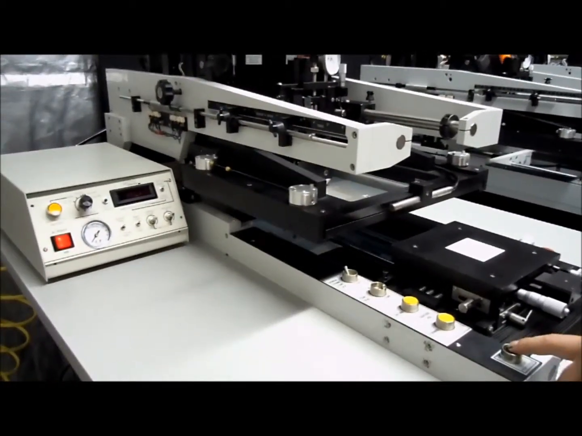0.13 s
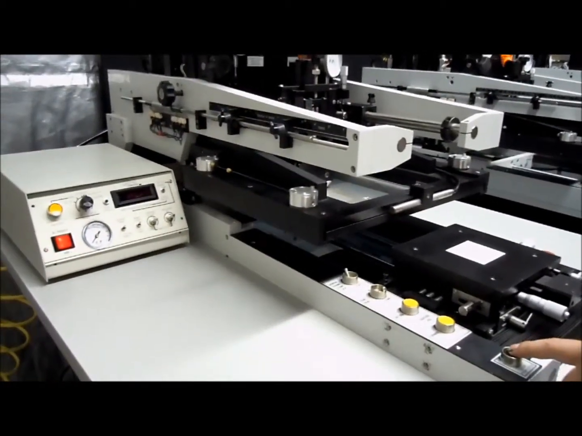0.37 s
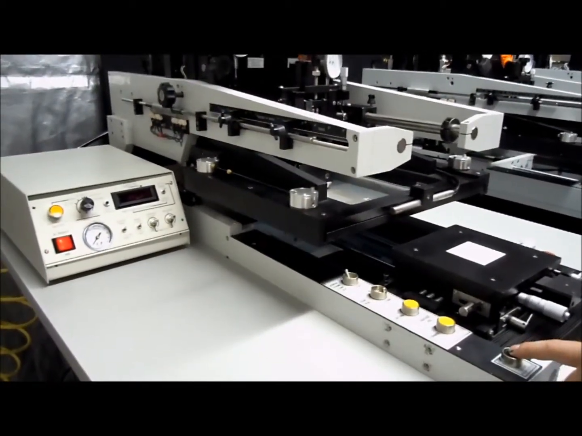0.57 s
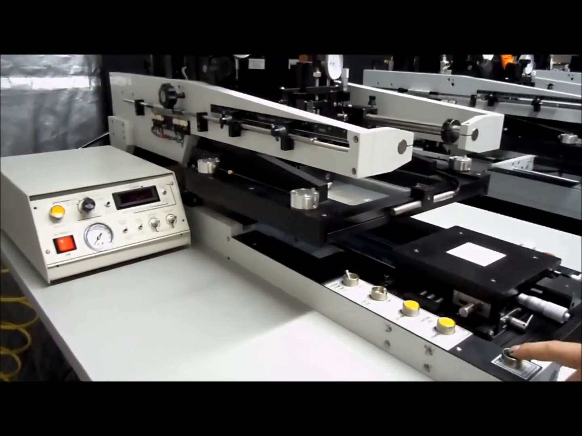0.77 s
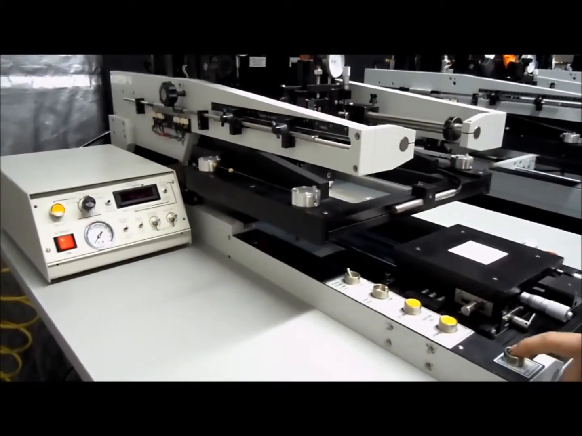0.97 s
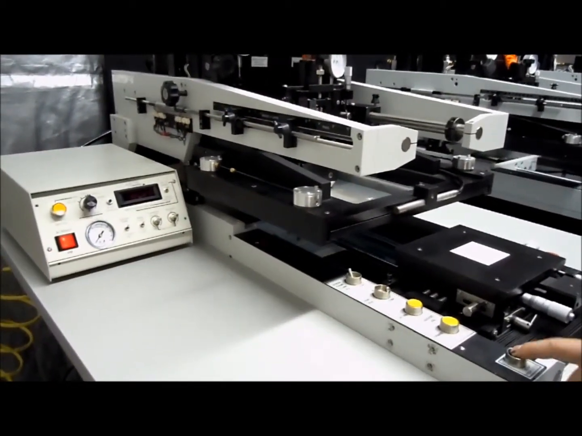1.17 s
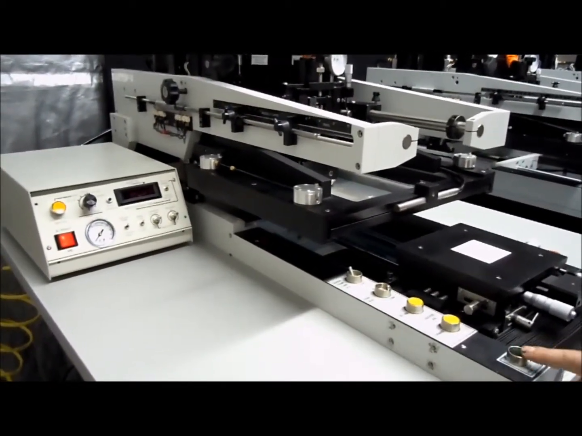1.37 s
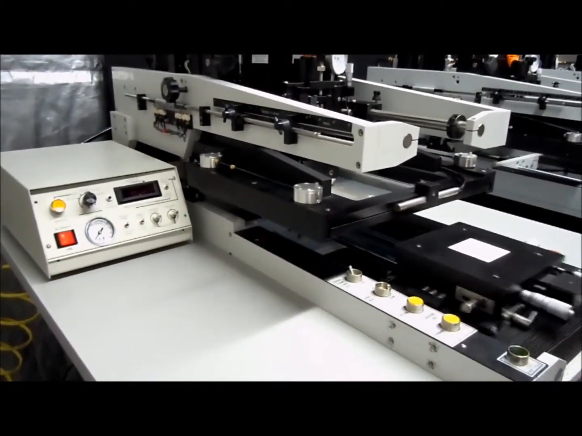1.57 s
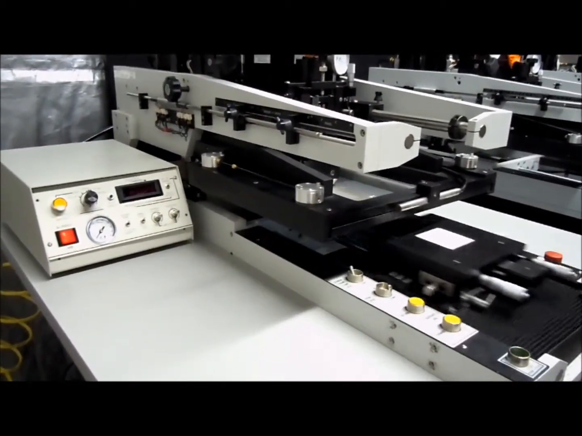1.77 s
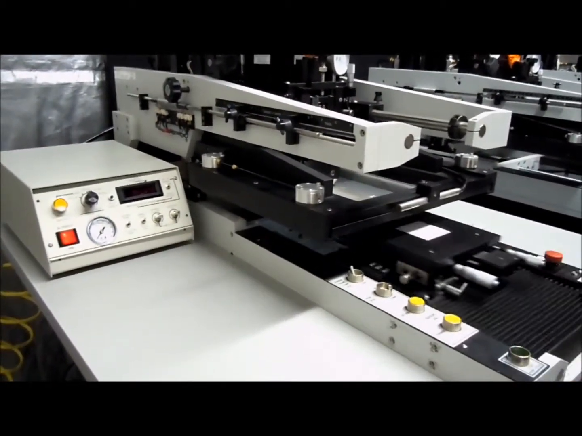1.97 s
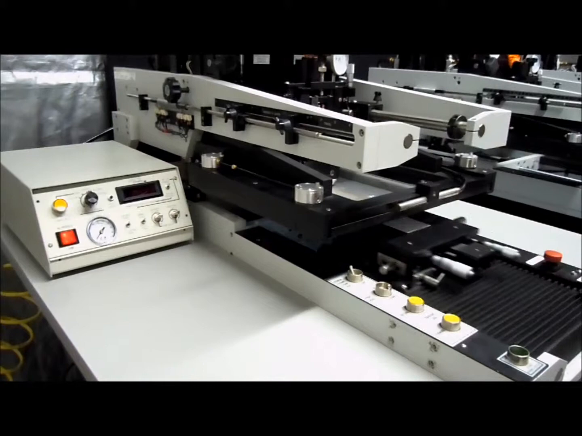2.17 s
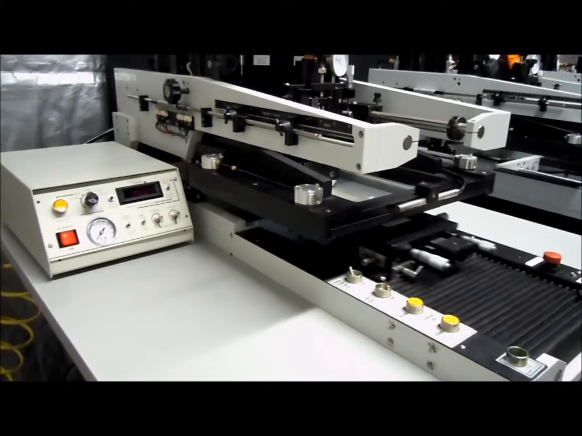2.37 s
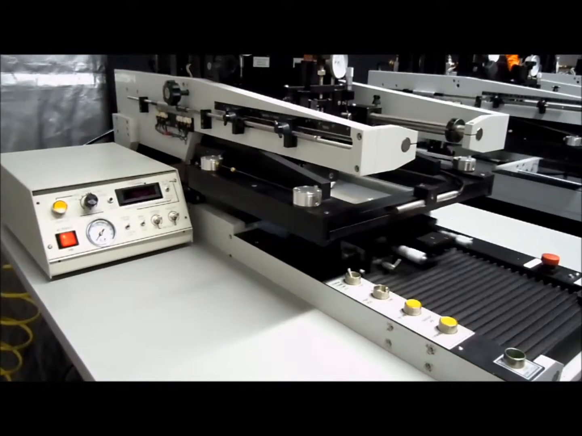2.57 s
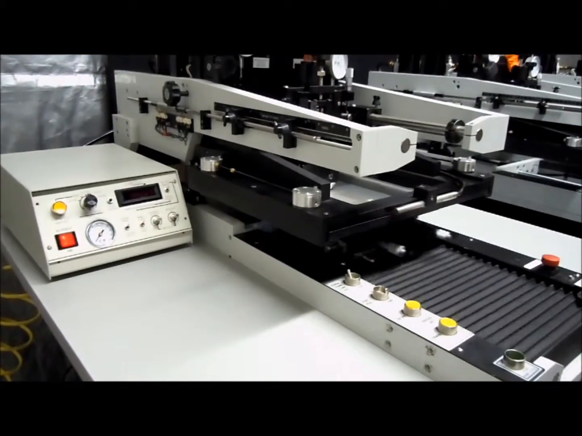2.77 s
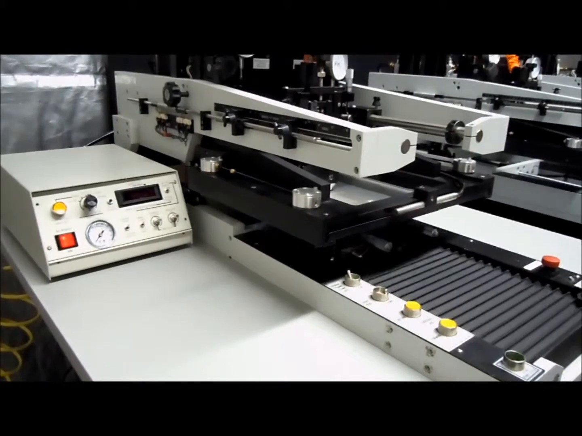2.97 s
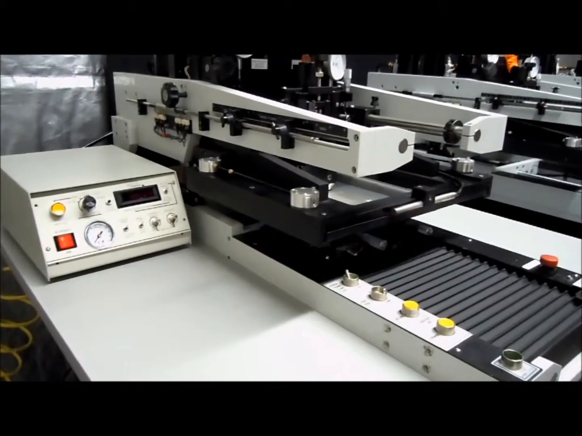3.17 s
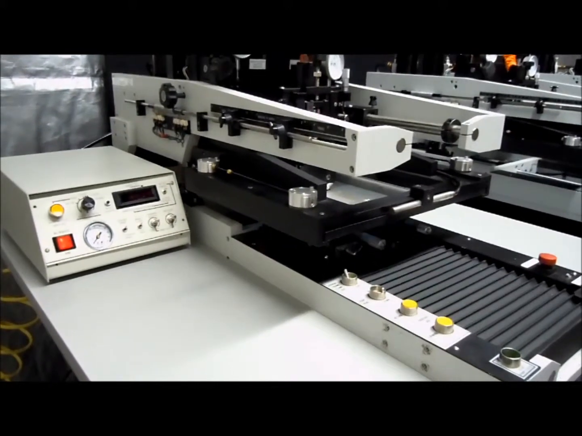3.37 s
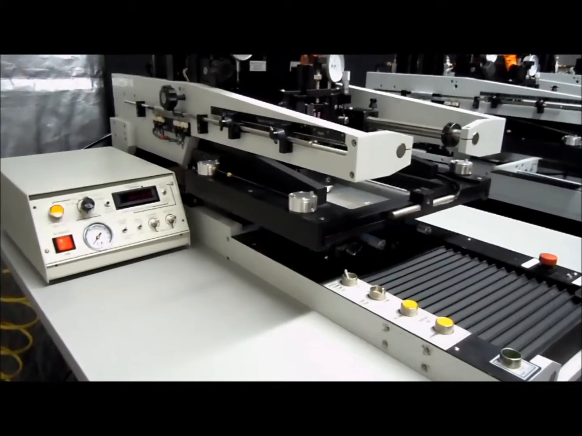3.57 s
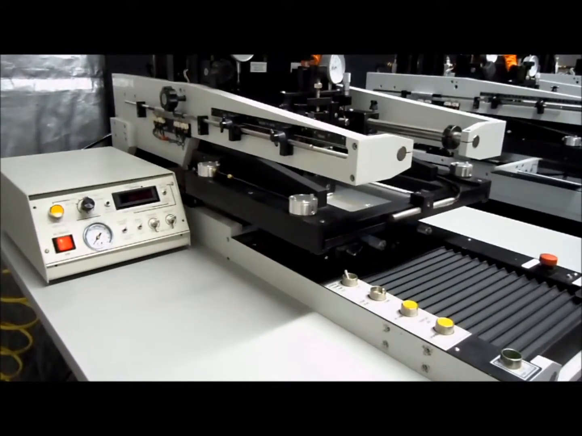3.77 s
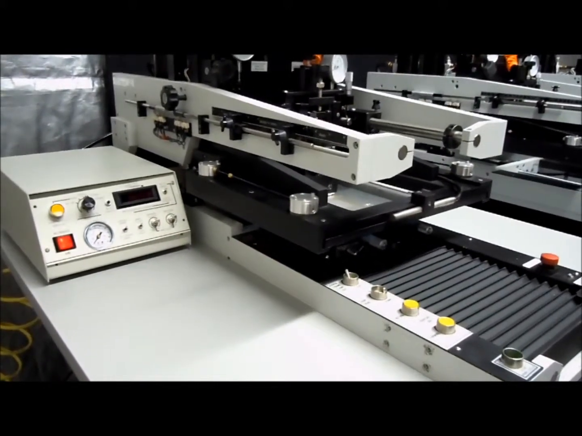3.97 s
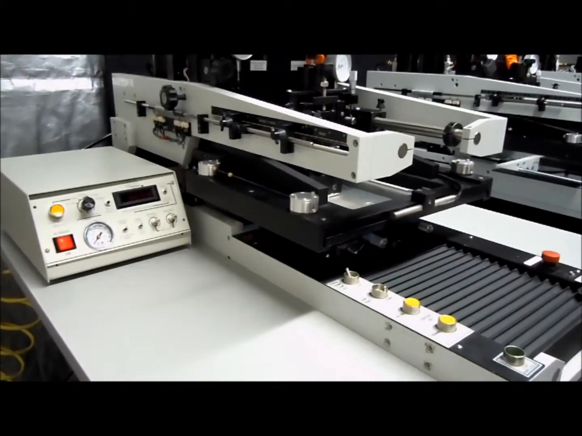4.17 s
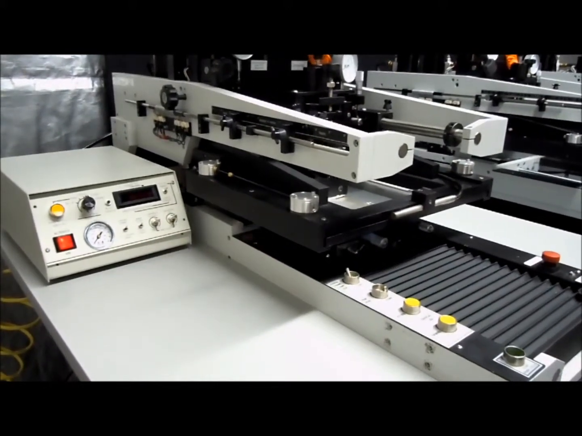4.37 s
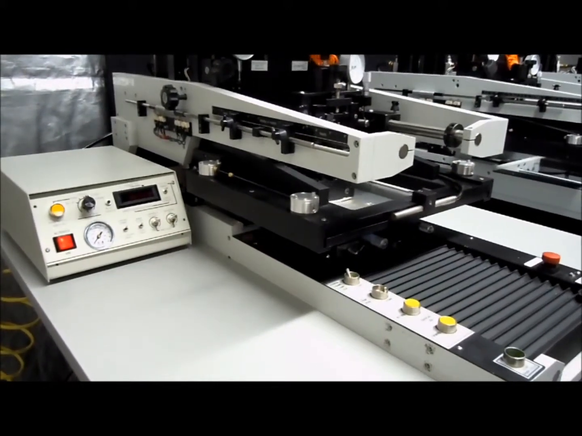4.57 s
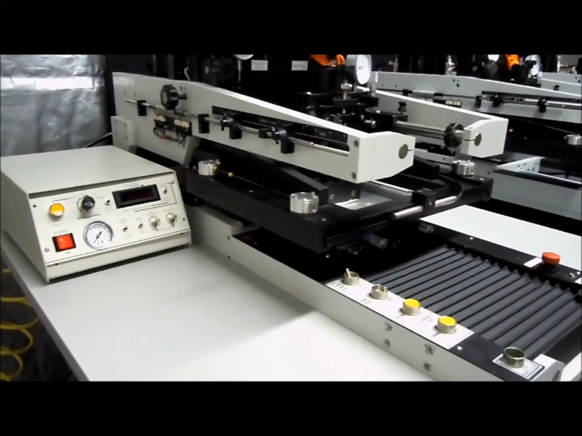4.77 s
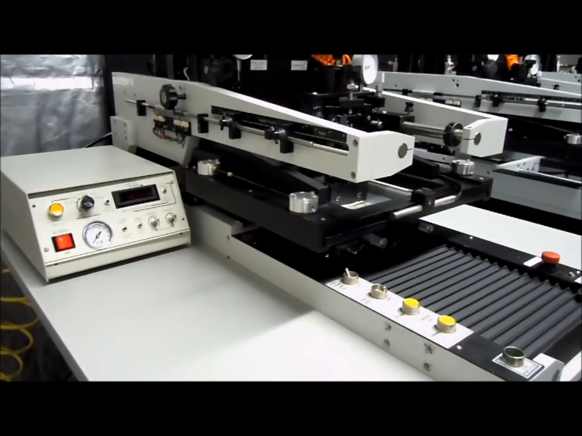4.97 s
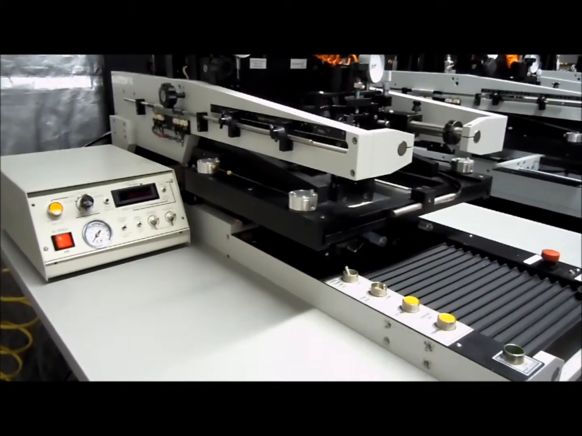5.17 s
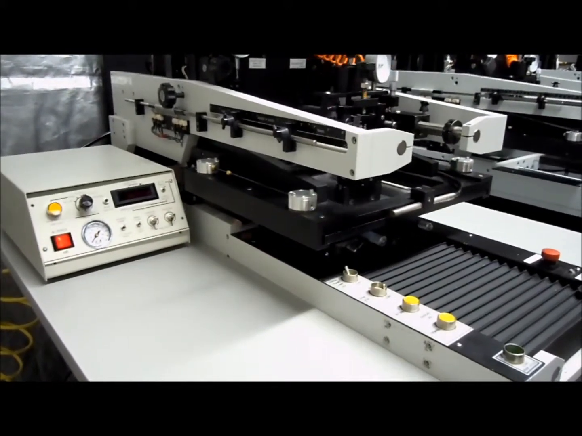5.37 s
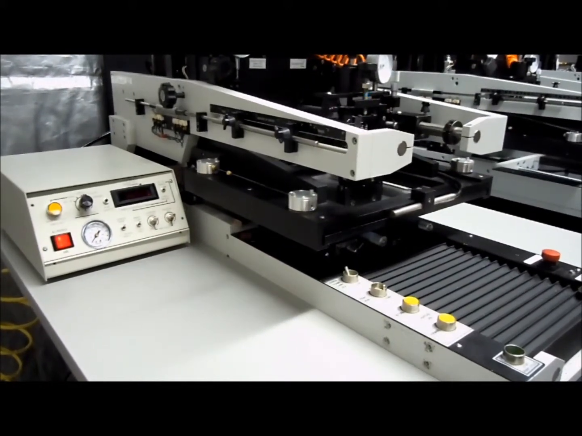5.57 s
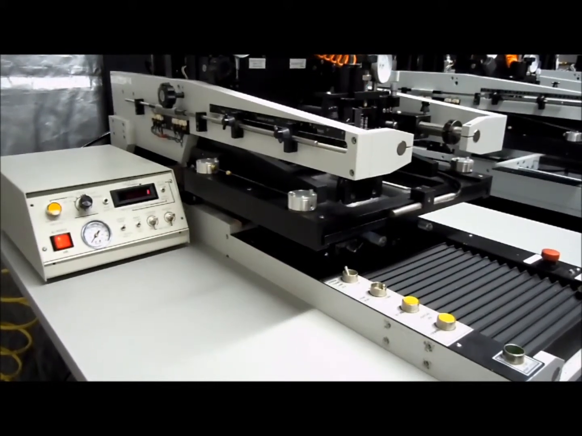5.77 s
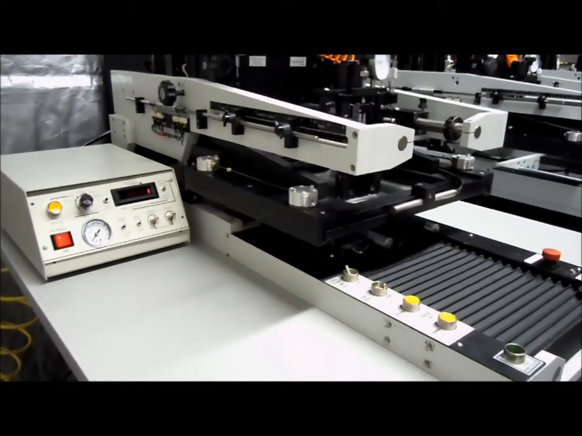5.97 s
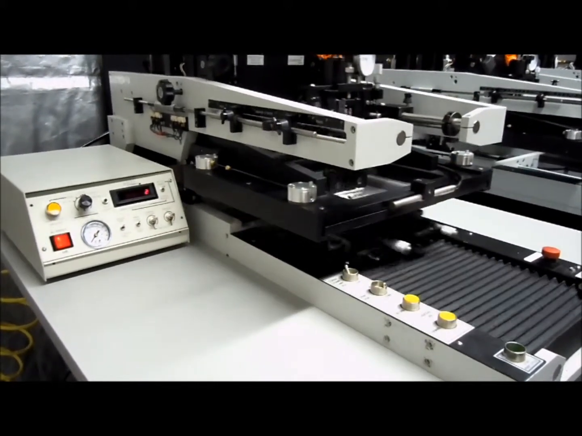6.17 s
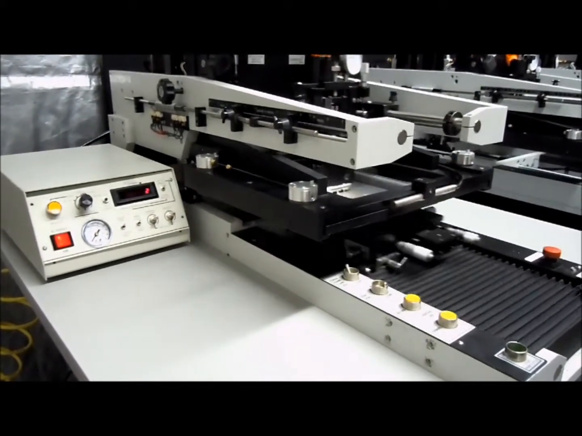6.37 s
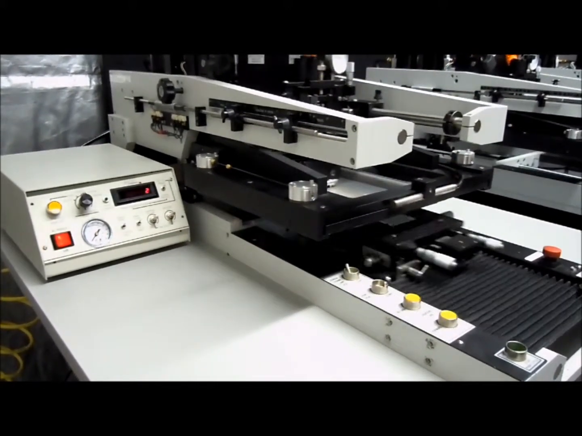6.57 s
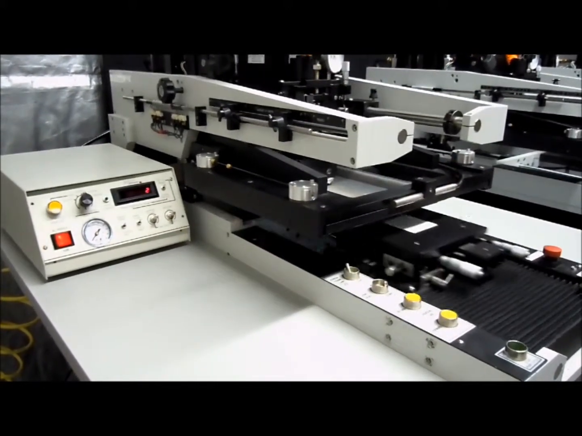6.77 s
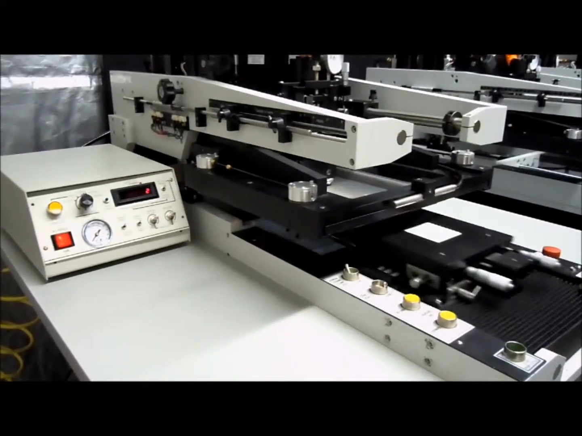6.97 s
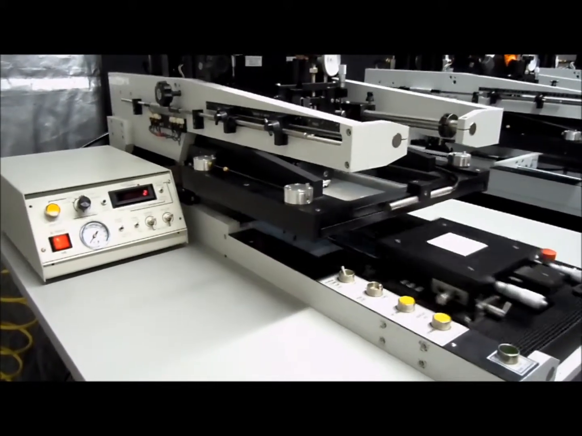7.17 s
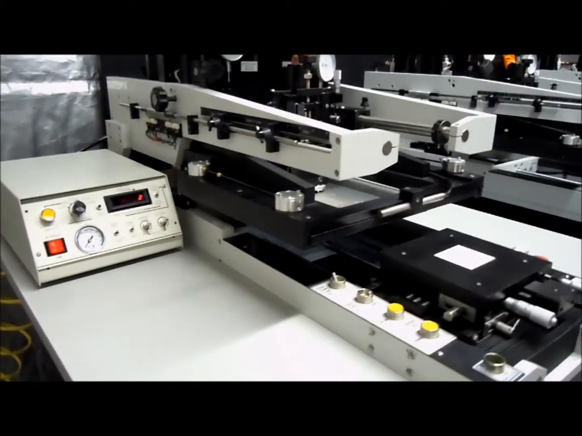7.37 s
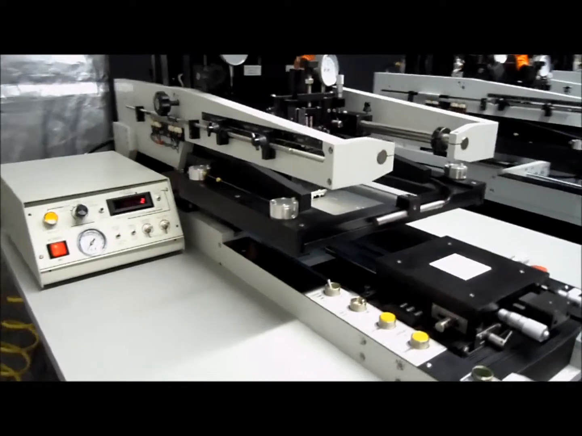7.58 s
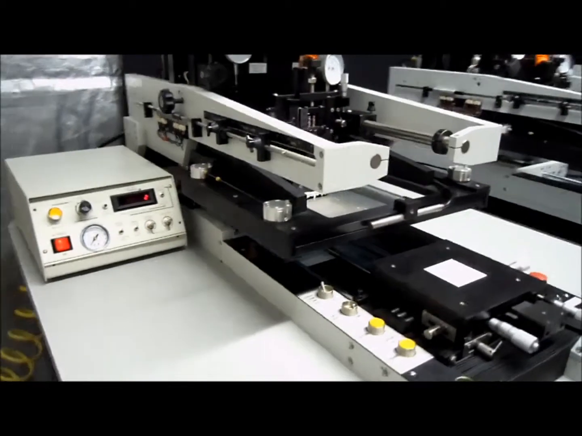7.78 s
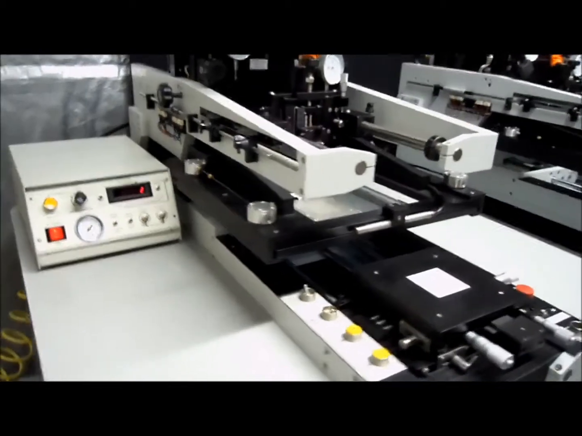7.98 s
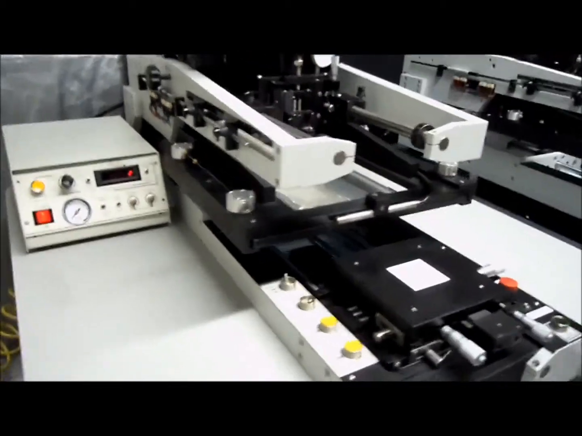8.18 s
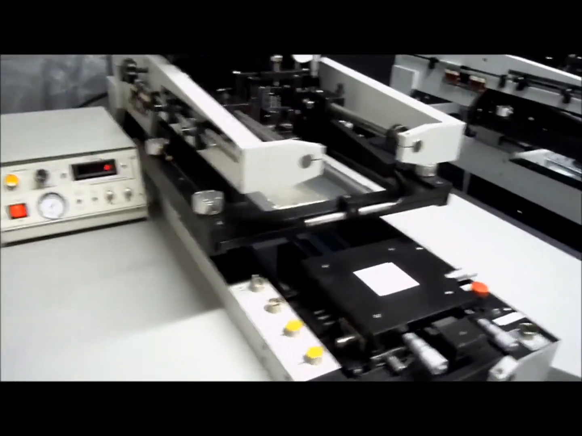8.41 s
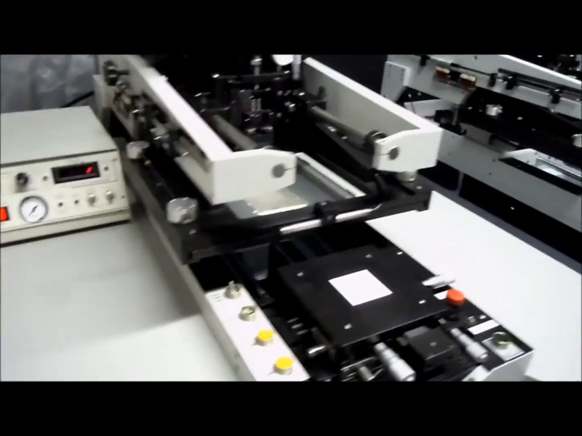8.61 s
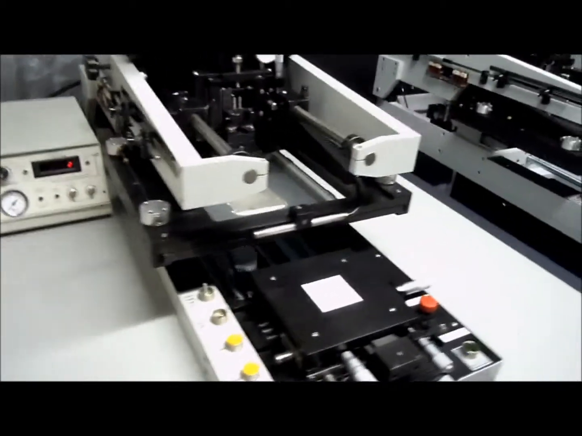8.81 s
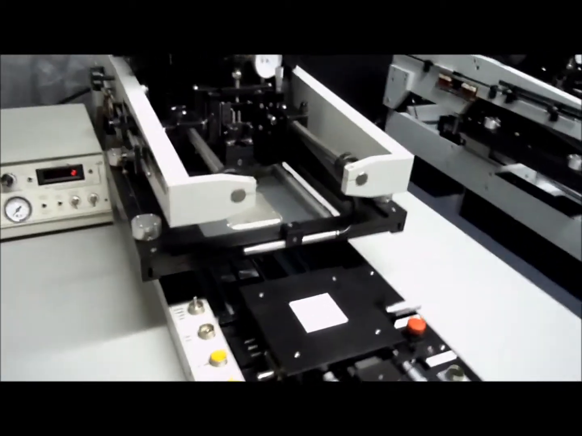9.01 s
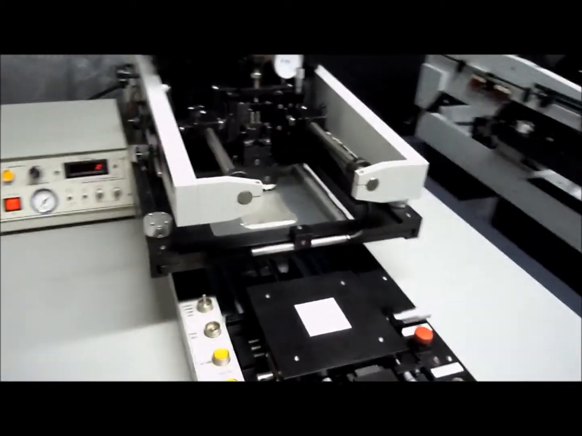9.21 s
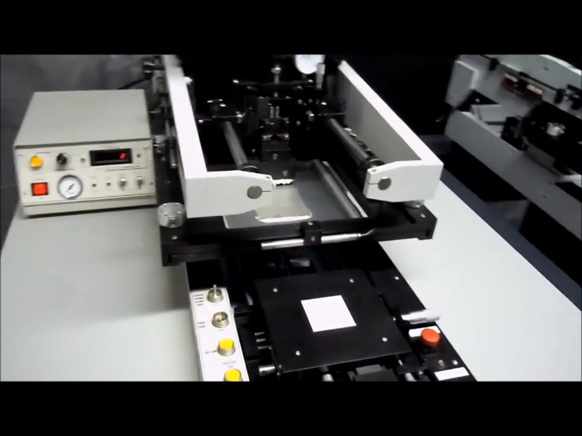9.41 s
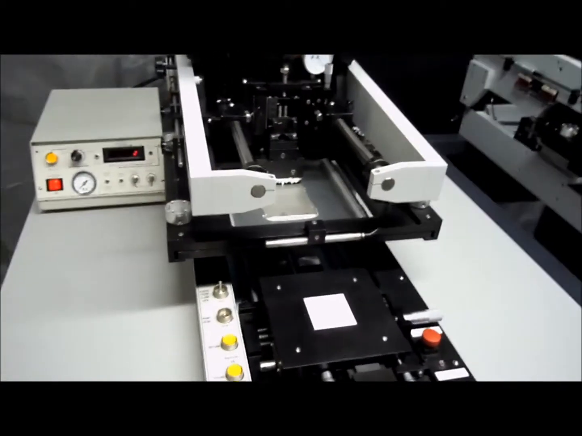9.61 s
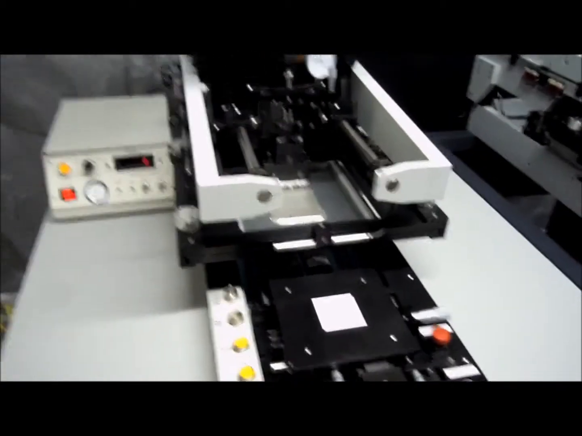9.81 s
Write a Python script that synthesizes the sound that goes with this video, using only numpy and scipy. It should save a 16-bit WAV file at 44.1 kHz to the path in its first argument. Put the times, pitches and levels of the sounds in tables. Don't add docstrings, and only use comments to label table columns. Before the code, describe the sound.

Close metallic clicks and thuds punctuate four spells of hissing compressed air as a machine table slides in and back, ending with faint cloth rustle.

```python
import sys
import numpy as np
from scipy import signal
from scipy.fft import rfft, irfft, next_fast_len
from scipy.io import wavfile
from scipy.ndimage import uniform_filter1d, map_coordinates

SR = 44100
rng = np.random.default_rng(int(sys.argv[2]) if len(sys.argv) > 2 else 0)


def wrap_up_sound(samples):
    columns = np.atleast_2d(samples).T
    tamed = np.clip(columns, -1, 1)
    steps = np.round(tamed * 32767).astype(np.int16)
    wavfile.write(sys.argv[1], SR, steps)


def decibels_to_gain(level_db):
    exponent = np.asarray(level_db, float) / 20
    return 10 ** exponent


N = 434385

# frequency in Hz, level in dB.
RUMBLE_COLOUR = [(12, -28.5), (20, 0.5), (54, -3.5), (151, -10.5), (184, -10), (258, -13.5), (375, -17.5),
                 (700, -27.5), (910, -52.5), (1540, -120)]
# frequency in Hz, level in dB.
LEAK_COLOUR = [(180, -34), (300, -4.5), (382, -7.5), (641, -7), (2120, -12.5), (2580, -11.5), (4180, -17.5),
               (5000, -23.5), (5600, -20.5), (7250, -16.5), (8120, -13), (12000, -22), (14300, -19.5)]
# frequency in Hz, width in Hz, level in dB.
LEAK_PIPES = [(1990, 22, 0), (2550, 184, -6.5), (5000, 240, 0.5), (7880, 50, 3.5)]
# time in seconds, level in dB.
WORKSHOP_LEVEL = [(0, -49.5), (4.7, -49.5), (8, -53.5), (9.85, -55.5)]
# peak in seconds, level in dB, rise in seconds, fall in seconds.
BENCH_SWAYS = [
    (3.9, -55.5, .4, 0.5),
    (6.8, -57, 0.12, .4),
    (7.7, -52, 0.53, 1),
    (9.85, -54.5, 2.4, 1.),
]
# peak in seconds, level in dB, rise in seconds, fall
# in seconds.
RUSTLES = [
    (4.51, -42, 0.05, .06),
    (7.99, -56, 0.123, 0.08),
    (8.27, -52.5, 0.096, 0.35),
    (8.56, -50, 0.064, 0.17),
    (8.9, -57, .15, .2),
    (8.97, -52, 0.1, .1),
    (9.05, -43, 0.13, 0.12),
    (9.772, -47, 0.023, 0.16),
    (9.806, -47, 0.017, 0.23),
]
# frequency in Hz, level in dB.
CLOTH_COLOUR = [(470, -36.5), (800, -13), (1130, -9), (1430, -8.5), (3150, -10.5), (5240, -10.5),
                (7840, -4), (13500, -25)]
# peak in seconds, level in dB, rise in seconds, fall in seconds.
SLEEVE_SCUFFS = [
    (8.24, -56, .03, 0.27),
    (8.33, -56.5, 0.095, .1),
    (9.06, -52, 0.18, .15),
]

# start in seconds, peak in dB, clack in dB, t60 in seconds.
SPOOL_SNAPS = [(.9975, -7.5, -11.5, 0.027), (1.3753, -6, -22, 0.032), (1.381, -22, -1, 0.037),
               (1.5015, -15, -4, 0.035), (2.1029, -17.5, -0.5, 0.025), (3.972, -4, -18.5, 0.058),
               (4.4982, -18, -20, 0.018), (5.2203, -5.5, -18, 0.03), (5.863, -12.5, -11, 0.049),
               (6.784, -5, -11.5, 0.055), (7.2544, -27.5, -16, 0.03847)]
# start in seconds, peak in dB, clack in dB, t60 in seconds.
SOLENOID_SNAPS = [(.1758, -31.5, -16, 0.029), (1.022, -12, -9, 0.041), (3.1916, -31.5, -20, .06),
                  (3.1945, -24.5, -29, .03), (3.2143, -11, -34.5, 0.029), (3.2361, -15.5, 1.5, 0.045),
                  (3.2463, 2.5, -20, 0.062), (5.4884, -22.5, -26.5, 0.032), (9.8025, -32, -8, 0.032)]
# start in seconds, peak in dB, clack in dB, t60 in seconds.
PISTON_SNAPS = [(1.0622, -14, 9, 0.033), (1.939, -14, -29, .016), (5.5487, 0, -7.5, 0.03),
                (5.5638, -4, -10, 0.035), (5.5824, -2.5, -2.5, 0.025), (5.9755, -11, -13, 0.041),
                (6.7236, -24.5, -2.5, 0.055)]
# start in seconds, peak in dB, clack in dB, t60 in seconds.
PLATE_SNAPS = [(1.0437, -6, -12, 0.071), (1.8775, -9, -22, .02), (1.9775, -15.5, -15, 0.02),
               (2.1099, -7.5, -12.5, 0.024), (5.5144, -36.5, -15.5, 0.049), (5.5367, -15.5, -11, 0.053),
               (5.7449, -5.5, -12.5, 0.052), (6.0464, -28.5, 2, 0.059)]
# start in seconds, peak in dB, clack in dB, t60 in seconds.
LATCH_SNAPS = [(1.918, -18, -21, 0.023), (3.8077, -18, -10.5, .059), (5.407, -38.5, 0, 0.09),
               (8.536, -37, -9, 0.036), (9.3685, -46.5, -12, 0.048), (8.855, -46, -13, .03),
               (9.7672, -36, -4, .04)]
# start in seconds, peak in dB, clack in dB, t60 in seconds.
STOP_SNAPS = [
    (1.0505, -8, -8, .03),
    (1.0535, -0.5, -4.5, 0.051),
    (6.7752, -17, -9, 0.0726),
    (7.4258, -13, -7.5, 0.042),
]
# start in seconds, peak in dB, top ring in dB, t60 in seconds.
BLEED_SPITS = [(3.2145, -24, 4, .025), (3.2475, -15.5, 8.5, 0.055), (5.5495, -14, 4, .06),
               (4.4716, -30, -2, .014), (4.4765, -23, -3, .014), (4.480, -27, -3, .012),
               (4.484, -25, -2, .012), (4.4875, -27, -3, .014), (4.4915, -29, -3, .012),
               (4.495, -24, -4, .014), (4.501, -17.5, -8, 0.015), (4.5035, -19, -8, .025)]
# start in seconds, peak in dB, clack in dB, t60 in seconds.
CHAIN_SNAPS = [(1.7064, -16, -10, .02), (1.7254, -11, -10, .02), (1.7394, -15, -10, .016),
               (1.7504, -13, -10, .02), (1.7964, -14, -10, .02), (1.8104, -12, -10, .016),
               (1.8374, -11, -10, .016), (1.8544, -16, -10, .016), (1.8914, -17, -10, .016),
               (1.9434, -15, -12, .016), (1.9634, -20, -12, .016)]
# start in
# seconds, peak in dB, frequency in Hz, t60 in seconds.
PURE_NOTES = [(9.8025, -30.5, 2400, 0.043), (9.8025, -32, 4400, 0.033), (9.82, -37, 2000, .03),
              (1.055, -14, 1400, .06), (1.965, -28, 1580, .02), (6.724, -28, 1800, .04),
              (5.582, -12, 1700, .04), (5.2205, -10, 9400, .03), (.998, -17, 4200, .02),
              (1.0, -30, 1600, 0.056), (1.0222, -16, 3650, .035), (1.38, -32, 2200, 0.034),
              (1.502, -31, 2300, 0.027), (1.519, -37, 1300, .03), (1.528, -44, 670, .04),
              (3.245, -27, 500, .06), (3.673, -23.5, 340, 0.062), (3.673, -25.5, 960, .03),
              (3.935, -29, 494, .03), (7.431, -17.5, 2110, .04), (7.428, -25.5, 1395, .08),
              (9.767, -38, 790, .06), (9.803, -36, 810, 0.077), (4.138, -28.5, 716, .1),
              (6.786, -22.5, 232, 0.16), (6.786, -27, 357, 0.13), (7.427, -20, 4500, .025),
              (7.427, -17, 8600, .025), (2.111, -21, 1047, 0.041), (5.2205, -10, 4000, 0.021),
              (5.225, -42, 4160, 0.22), (5.542, -13, 1070, 0.14), (5.552, -8.5, 1530, 0.08),
              (5.4885, -22, 6730, .03), (8.0893, -40, 8100, .04), (5.94, -22, 3800, 0.051),
              (6.776, -20.5, 1004, 0.049), (7.256, -31.5, 960, 0.076), (7.427, -12.5, 3220, 0.027)]

# start in seconds, peak in dB, deep thump in dB, t60 in seconds.
FEET_BLOWS = [
    (3.239, -21.5, -9, 0.17),
    (5.22, -28, -12.5, 0.14),
    (5.868, -31, -4, 0.51),
    (7.139, -29.5, -8.5, 0.083),
    (7.427, -21.5, -16, 0.26),
]
# start in seconds, peak in dB, deep thump in dB, t60 in seconds.
BED_BLOWS = [
    (1.702, -35.5, -18, 0.3),
    (3.826, -24.5, -16, 0.22),
    (3.992, -29.5, -18, 0.21),
    (4.136, -27, -32, 0.35),
    (4.397, -32, -27.5, 0.42),
    (6.351, -29, -20.5, 0.3),
]
# start in seconds, peak in dB, deep thump in dB, t60 in seconds.
ARM_BLOWS = [(1.042, -15, -40.5, 0.19), (3.112, -35, -21, 0.18), (3.66, -30, -25, .1),
             (3.6725, -17.5, -29, 0.04), (3.81, -25.5, -8, 0.31), (3.934, -25.5, -15, 0.11),
             (5.41, -33.5, -25, 0.18), (5.743, -24.5, -11.5, 0.18), (6.725, -25.5, -9.5, 0.29)]
# start in seconds, peak in dB, deep thump in dB, t60 in seconds.
HOOD_BLOWS = [(1.05, -17.5, -40.5, 0.19), (3.243, -19, -33, 0.086), (2.108, -31, -22, .12),
              (5.537, -17, -15, 0.27), (6.046, -30, -8.5, 0.43), (6.784, -13.5, -17, 0.12),
              (7.252, -35, -21, 0.5), (7.43, -30, -30, 0.22)]
# frequency in Hz, level in dB, t60 in seconds.
FRAME_MODES = [(231, -6, 0.15), (346.5, -5, 0.39), (481, -9, 0.2), (562, -2.5, 0.12), (710, -6.5, 0.19)]
# frequency in Hz, level in dB, t60 in seconds.
BENCH_MODES = [(62, -9.5, 0.23), (112, 5.5, 0.47), (142.3, -3, 0.23)]

# time in seconds, jet level in dB.
VENT_PRESSURES = [
    [(1.07, -22), (1.37, -28), (1.69, -33.5), (1.8, -33.5), (1.92, -30), (2.5, -31.5), (3.01, -30.5),
     (3.08, -41), (3.16, -46)],
    [(3.26, -16.5), (3.294, -19.5), (3.394, -21), (3.472, -23), (3.66, -22), (3.966, -22.5), (4.134, -30),
     (4.42, -56)],
    [(5.553, -9), (5.6, -17.5), (5.741, -21.5), (5.75, -13.5), (5.81, -22.5), (5.994, -24.5), (6.102, -29),
     (6.588, -34), (6.78, -32.5)],
    [(6.795, -8.5), (6.827, -15), (6.931, -18), (7.2, -22.5), (7.361, -29.5), (7.435, -30.5), (7.507, -39),
     (7.66, -60)],
]
# frequency in Hz, level in dB.
JET_COLOURS = [
    [(530, -47), (900, -31.5), (1820, -24), (2140, -22.5), (4800, -7.5), (6330, -3), (9260, 0.5),
     (10300, -3.5), (14200, -8)],
    [(530, -62), (900, -29), (1460, -20.5), (1680, -9.5), (2400, -17.5), (2990, -11.5), (4550, -11),
     (4900, 2.5), (6040, -2.5), (7440, -3), (8450, -2.5), (11500, -2.5), (12900, -5.5), (14200, -8.5)],
    [(530, -21), (900, -11.5), (1160, -16), (1450, -15.5), (1880, -11.5), (2540, -10), (3000, -7),
     (4230, -5), (6190, -2), (8950, 4.5), (12500, -5), (14200, -7.5)],
    [(410, -46.5), (700, -24), (935, -16), (1160, -22), (2440, -13.5), (2690, -14), (4030, -4), (4570, -7),
     (5590, -1), (6420, -8.5), (8060, 4), (11000, -3.5), (11900, -8), (12800, -3), (14200, -9)],
]
# frequency in Hz, width in Hz, level in dB.
SILENCER_PIPES = [
    [(8220, 65, -2), (8510, 50, -4), (9450, 44, 0), (9440, 170, 3), (13700, 66, -10)],
    [(5100, 130, -1), (5400, 200, -5), (6950.8, 150, 4.5), (8890, 130, 0), (10350, 130, 0), (11410, 230, 3)],
    [(4100, 49, -2), (5400, 75, -5), (8050, 50, 0.5), (8980, 130, 4), (9250, 23, -1), (9860, 100, 2),
     (10800, 50, -0.5), (12160, 50, -3.5), (10300, 110, 0.5), (13450, 200, -0.5)],
    [(3620, 160, -13), (4120, 83, -6), (5730, 63, -7.5), (8190, 170, 4.5), (8830, 50, -0.5),
     (10300, 110, -14), (11830, 120, -1), (13820, 150, -5)],
]
# frequency in Hz, width in Hz, level in dB.
LATE_SILENCER_PIPES = [
    [(9390, 100, 4), (8190, 65, 1), (6100, 60, -7.5), (9800, 55, -4)],
    [(5000, 110, 4.5), (5650, 100, 2), (6950, 135, 1.5), (8610, 80, -0.5), (11300, 200, 1.5)],
    [(4090, 70, -4.5), (5220, 50, -3.5), (8060, 74, 7.5), (8950, 70, -1.5), (9550, 200, -1.5),
     (10300, 80, 2.5)],
    [(3630, 100, -6.5), (4060, 70, -2.5), (5750, 60, -5), (7820, 40, 2), (8190, 149, 1.5), (10300, 60, 0),
     (11800, 90, -0.5)],
]
# steady level in dB under the jet, opening blast in dB under it,
# blast t60 in seconds.
JET_BODIES = [(-20, -7, 0.27), (-18.5, -33, 0.27), (-15, -22.5, 0.45), (-16, -18, 0.48)]

# frequency in Hz, level in dB.
LINK_COLOUR = [(1180, -43), (2000, -21), (3300, -9.5), (5030, -2.5), (6130, -1.5), (8440, 4.5),
               (13500, -10.5), (14300, -13)]
# time in seconds, level in dB.
ROLLS = [
    [(1.95, -53), (2.1, -53.5), (2.66, -48.5), (2.88, -42.5), (3.07, -47.5), (3.2, -53.5)],
    [(6.1, -75), (6.4, -52.5), (6.72, -47.5)],
]
# frequency in Hz, level in dB.
RAIL_COLOUR = [(180, -38.5), (300, -7), (563, 6), (762, -2), (1070, -3.5), (1600, -13), (2080, -32.5),
               (3520, -120)]
# frequency in Hz, level in dB.
BLADE_COLOUR = [(2000, -43), (2750, -20.5), (2900, 4.5), (3500, 3.5), (4300, -7), (5000, -41.5),
                (8000, -89.5)]

# frequency in Hz, t60 in seconds.
ROOM_DECAY = [(200, 0.74), (2000, 0.28), (10000, 0.29)]
# frequency in Hz, likeness from 0 to 1.
NEAR_ALIKE = [(60, .987), (2400, .98), (3100, .999), (4200, .985), (5500, .95), (6800, .86), (9000, .8),
              (14000, .66)]
# frequency in Hz, likeness from 0 to 1.
AROUND_ALIKE = [(60, 0.98), (180, 0.91), (540, 0.8), (1630, 0.53), (4900, 0.15), (14700, 0.076)]
# frequency in Hz, lead in radians.
PORT_LEAD = [(5800, 0), (7200, .6), (8800, 1.), (14000, .8)]
# frequency in Hz, level in dB.
PORT_TILT = [(60, 0.5), (150, -0.5), (380, -0.5), (940, 0), (2350, -0.5), (5890, -1), (14700, 5)]


def unit(x):
    return x / np.sqrt(np.mean(x ** 2) + 1e-20)


def along(points, hz):
    f, v = np.transpose(points)
    return np.interp(np.log(hz + 1), np.log(f + 1), v)


def fader(rows, fade=0.004):
    s, db = np.transpose(rows)
    t = np.arange(N) / SR
    gate = np.clip(np.minimum(t - s[0], s[-1] - t) / fade + 1, 0, 1)
    return gate * decibels_to_gain(np.interp(t, s, db))


def held(start, end, db, rise, fall):
    t = np.arange(N) / SR
    outside = np.maximum((start - t) / rise, (t - end) / fall)
    return decibels_to_gain(db - 20 * np.maximum(0, outside))


def swells(rows):
    return sum(held(s, s, db, rise, fall) for s, db, rise, fall in rows)


def wobble(rate):
    knots = rng.standard_normal(int(N * rate / SR) + 4)
    return map_coordinates(knots, [np.arange(N) * rate / SR])


def ripple(step_hz):
    knots = rng.standard_normal(int(SR / step_hz) + 4)
    return lambda f: map_coordinates(knots, [f / step_hz])


def filtered(x, response):
    m = next_fast_len(x.shape[-1] + 4096)
    spectrum = rfft(x, m) * response(np.fft.rfftfreq(m, 1 / SR))
    return irfft(spectrum, m)[..., :x.shape[-1]]


def hump(f, hz, width):
    return 1j * f * width / (hz * hz - f * f + 1j * f * width)


def colour(spectrum, pipes=(), pipe_db=0):
    def gain(f):
        power = decibels_to_gain(2 * along(spectrum, f))
        for hz, width, db in pipes:
            power = power + decibels_to_gain(2 * (db + pipe_db)) * abs(hump(f, hz, 2 * width)) ** 2
        return np.sqrt(power)
    return gain


def rush(response, flutter_db=0.0, rate=40):
    noise = filtered(rng.standard_normal((2, N)), response)
    return unit(noise * decibels_to_gain(flutter_db * wobble(rate)))


def blow(t, t60, spike, response):
    swell = 1 - np.exp(-t * 80 / t60)
    push = rng.standard_normal((2, len(t))) * decibels_to_gain(-60 * t / t60) * swell
    push[:, 8] += spike * np.array([1, 0.5 * rng.normal()])
    sound = filtered(push, response)
    return sound / abs(sound[0]).max()


def place(out, s, sound):
    start = round(s * SR)
    out[:, start:start + sound.shape[1]] += sound


def workshop():
    near = fader(WORKSHOP_LEVEL)
    rumble_gain = decibels_to_gain(2.5) * near + swells(BENCH_SWAYS)
    rumble = rumble_gain * rush(colour(RUMBLE_COLOUR), flutter_db=2.14, rate=5)
    leaks = near * rush(colour(LEAK_COLOUR, LEAK_PIPES, pipe_db=-11.5))
    cloth = swells(RUSTLES) * rush(colour(CLOTH_COLOUR), flutter_db=2.5, rate=60)
    scuff = swells(SLEEVE_SCUFFS) * rush(lambda f: hump(f, 2100, 1800), flutter_db=3.0, rate=60)
    seep_gain = held(start=4.5, end=7, db=-51.5, rise=1, fall=0.5)
    seep = seep_gain * rush(lambda f: hump(f, 9160, 9000) ** 2)
    whistle_gain = held(start=5, end=4.5, db=-50.5, rise=0.5, fall=0.1)
    whistle = whistle_gain * rush(lambda f: hump(f, 8600, 300))
    return rumble + leaks + cloth + seep + whistle + scuff


def clicks():
    parts = [  # snaps, ring Hz, clack Hz
        (SPOOL_SNAPS, 9300, 4250), (SOLENOID_SNAPS, 7600, 3750), (PISTON_SNAPS, 9800, 1980),
        (PLATE_SNAPS, 8850, 1200), (LATCH_SNAPS, 6600, 1550), (STOP_SNAPS, 5300, 2600),
        (BLEED_SPITS, 9000, 12000), (CHAIN_SNAPS, 8930, 6200)]
    out = np.zeros((2, N + SR))
    t = np.arange(SR // 5) / SR

    def hardness(t60):
        return min((0.035 / t60) ** 2, 1)

    for snaps, ring_hz, clack_hz in parts:
        def ring_and_crack(f):
            ring = 1.02 * hump(f, ring_hz, 0.22 * ring_hz)
            crack = 0.62 * hump(f, 8310, 6000) ** 2
            return (ring - crack) / (1 + (f / 11500) ** 6)

        def dull_clack(f):
            crack = 0.42 * hump(f, max(clack_hz, 2000), 2300) ** 2
            return hump(f, clack_hz, 0.19 * clack_hz) - crack

        for s, db, clack_db, t60 in snaps:
            bright = blow(t, t60, 3.2 * hardness(t60), ring_and_crack)
            clack = blow(t, 1.3 * t60, 9 * hardness(t60), dull_clack)
            place(out, s, decibels_to_gain(db + 0.5) * bright + decibels_to_gain(db + clack_db + 4.5) * clack)
    for s, db, hz, t60 in PURE_NOTES:
        note = blow(t, 1.26 * t60, 9 * hardness(t60), lambda f: hump(f, hz, 0.075 * hz))
        place(out, s, decibels_to_gain(db) * note)
    return out[:, :N]


def thuds():
    struck = [  # blows, knock Hz, share of frame ring
        (FEET_BLOWS, 246, 0.6), (BED_BLOWS, 357, 0.96), (ARM_BLOWS, 605, 0.6), (HOOD_BLOWS, 1120, 0.35)]
    out = np.zeros((2, N + SR))
    t = np.arange(SR // 2) / SR

    def ring(modes, f):
        return sum(decibels_to_gain(db + rng.normal(0, 4.0)) * hump(f, hz, 4.9 / t60) for hz, db, t60 in modes)

    for blows, knock_hz, share in struck:
        def frame_knock(f):
            body = hump(f, knock_hz, 0.85 * knock_hz) - 0.59 * hump(f, 460, 620)
            return (share * ring(FRAME_MODES, f) + body) / (1 + 1j * f / 900) ** 2

        for s, db, deep_db, t60 in blows:
            knock = blow(t, t60, 11.1, frame_knock)
            thump = blow(t, t60, 13, lambda f: ring(BENCH_MODES, f) / (1 + 1j * f / 220))
            place(out, s, decibels_to_gain(db + 1.5) * knock + decibels_to_gain(db + deep_db + 5.5) * thump)
    return out[:, :N]


def vents():
    late_drop_db = 16
    out = np.zeros((2, N))
    valves = zip(VENT_PRESSURES, JET_BODIES, JET_COLOURS, SILENCER_PIPES, LATE_SILENCER_PIPES)
    for rows, (body_db, blast_db, blast_t60), jet, pipes, late_pipes in valves:
        tone = colour(jet, pipes, pipe_db=2.5)
        late_tone = colour(jet, late_pipes, pipe_db=2.5)
        comb = ripple(45)
        air = rush(lambda f: tone(f) * decibels_to_gain(2.1 * comb(f)), flutter_db=0.87, rate=37)
        pressure = fader(rows, fade=0.014)

        drop = (pressure.max() / (pressure + 1e-9)) ** 2
        late = np.sqrt(np.clip(drop / decibels_to_gain(2 * late_drop_db), 0, 1))
        late_air = filtered(air, lambda f: late_tone(f) / tone(f))
        air += late * (late_air - air)

        body = filtered(air, lambda f: 1 / (1 + (f / 3300) ** 8))
        top = filtered(air, lambda f: 1 / (1 + (11500 / (f + 1)) ** 8))
        since = np.maximum(np.arange(N) / SR - rows[0][0], 0)
        body_gain = decibels_to_gain(body_db) + decibels_to_gain(blast_db - 60 * since / blast_t60)
        dulling = 1 - (pressure / pressure.max()) ** 0.22
        out += pressure * (air - body - dulling * top + body_gain * unit(body))
    return out


def table():
    t = np.arange(N) / SR
    spark_level = decibels_to_gain(np.minimum(3 * rng.exponential(size=N), 9))
    sparks = (rng.random(N) < 450 / SR) * spark_level
    tick_gate = 1.9 + unit(filtered(sparks, lambda f: 1 / (1 + 1j * f / 250)))
    ticks = unit(tick_gate * rush(colour(LINK_COLOUR)))
    scrape = rush(lambda f: hump(f, 1250, 1600), flutter_db=-2.0, rate=85)
    jerk_gain = held(start=1.701, end=1.88, db=-21.5, rise=0.02, fall=0.024)
    trail_gain = held(start=1.89, end=1.9, db=-33, rise=0.02, fall=0.3)
    scrape_gain = held(start=1.87, end=1.9, db=-31.5, rise=0.55, fall=0.13)
    chain = np.maximum(jerk_gain, trail_gain) * ticks + scrape_gain * scrape

    under_s, glide_s, open_hz = 2.54, 0.25, 1020
    rails = rush(colour(RAIL_COLOUR), flutter_db=1.0, rate=16)
    open_rails = decibels_to_gain(2.5) * unit(filtered(rails, lambda f: hump(f, open_hz, open_hz / 2)))
    under = np.clip((t - under_s) / glide_s + 0.5, 0, 1)
    roll_gain = sum(fader(rows, fade=0.042) for rows in ROLLS)
    drone = roll_gain * (under * rails + (1 - under) * open_rails)
    return (t > 1.695) * chain + drone


def squeegee():
    stroke = held(start=4.5, end=4.5, db=-47, rise=2, fall=1.04)
    return stroke * rush(colour(BLADE_COLOUR), flutter_db=-0.5, rate=27)


def room(x):
    hz, t, z = signal.stft(rng.standard_normal((2, SR // 2)), SR, nperseg=256)
    decay = decibels_to_gain(-60 * t / along(ROOM_DECAY, hz)[:, None])
    tail = signal.istft(z * decay, SR, nperseg=256)[1]
    delayed = np.pad(x, ((0, 0), (300, 0)))
    return signal.fftconvolve(delayed, tail / np.linalg.norm(tail[0]), axes=1)[:, :N]


def ports(pair, alike):
    def mid_side(f):
        turn = np.arccos(np.clip(along(alike, f), -1, 1)) / 2
        return np.array([np.cos(turn), np.sin(turn)])

    jag = ripple(300)

    def left_right(f):
        lead = along(PORT_LEAD, f) * (1 + 0.25 * jag(f))
        half = decibels_to_gain(along(PORT_TILT, f) / 2) * np.exp(0.5j * lead)
        return np.array([half, 1 / half])

    mid, side = filtered(pair, mid_side)
    return filtered(np.array([mid + side, mid - side]), left_right)


def ducking(loud):
    depth_db, from_db, window_s = 2.5, -28.5, 0.13
    level = np.sqrt(abs(uniform_filter1d(loud[0] ** 2, size=round(window_s * SR))))
    return decibels_to_gain(-depth_db * level / (level + decibels_to_gain(from_db)))


def scene():
    hits = clicks() + thuds()
    steady = vents() + table() + squeegee()
    machine = hits + steady + room(decibels_to_gain(-12.0) * hits + decibels_to_gain(-15.5) * steady)
    around = ducking(machine) * ports(workshop(), AROUND_ALIKE)
    return ports(machine, NEAR_ALIKE) + around


def band_limit(x):
    return signal.sosfilt(signal.butter(12, 15330, fs=SR, output="sos"), x)


def record(dry):
    limited = filtered(dry, lambda f: np.clip((14200 - f) / 250 + 0.5, 0, 1))
    mix = limited / (1 + abs(limited) ** 20) ** (1 / 20)
    return band_limit(mix)


dry = scene()
out = record(dry)
wrap_up_sound(out)
```